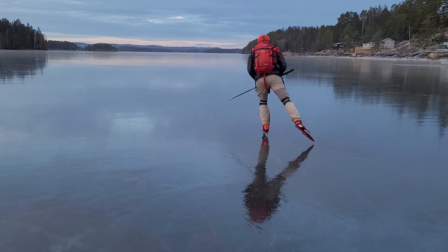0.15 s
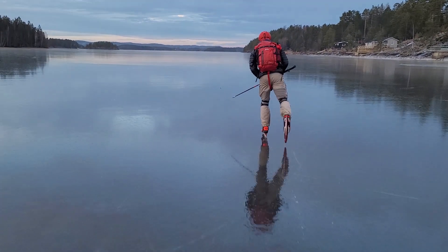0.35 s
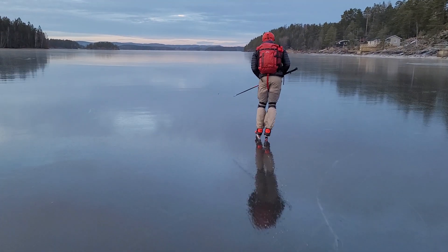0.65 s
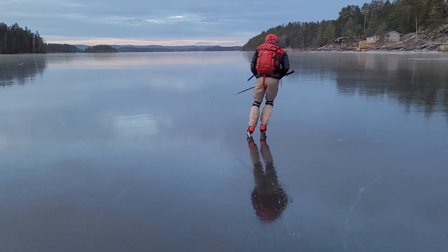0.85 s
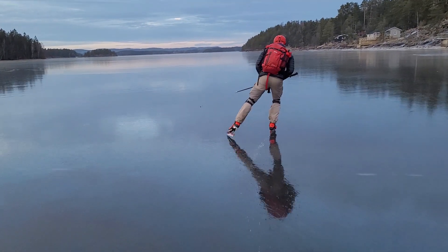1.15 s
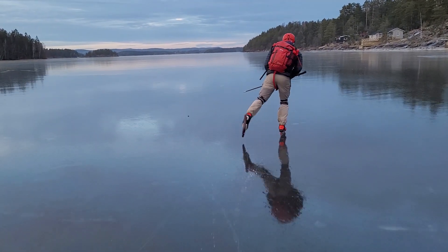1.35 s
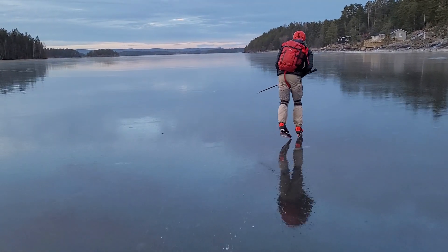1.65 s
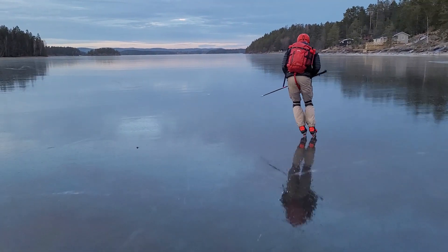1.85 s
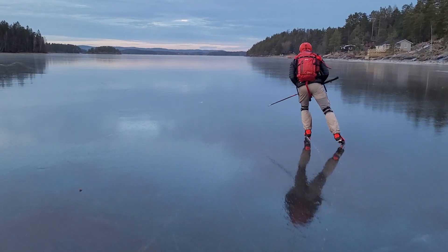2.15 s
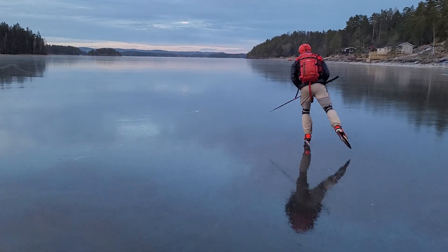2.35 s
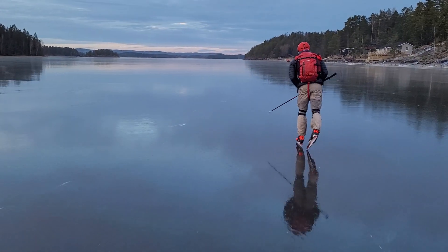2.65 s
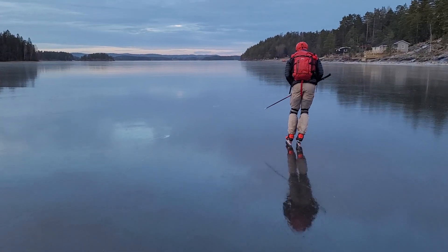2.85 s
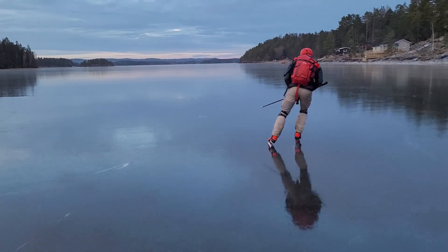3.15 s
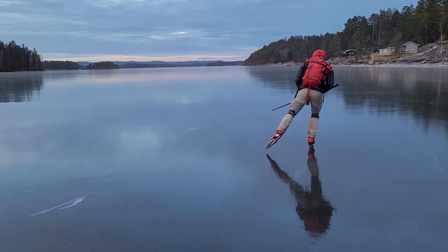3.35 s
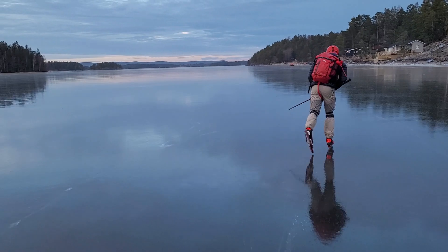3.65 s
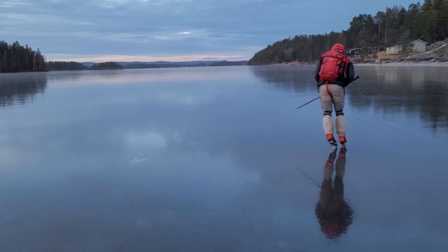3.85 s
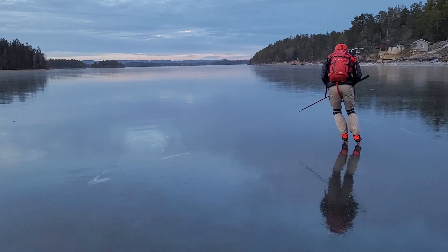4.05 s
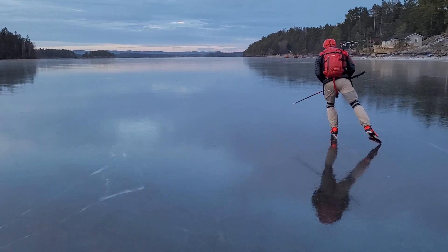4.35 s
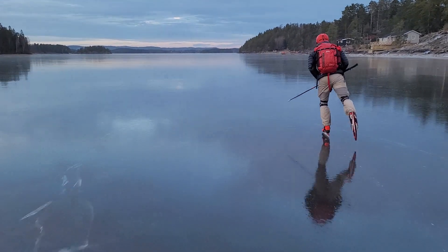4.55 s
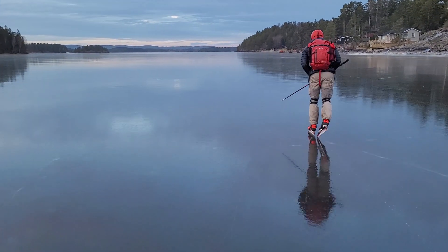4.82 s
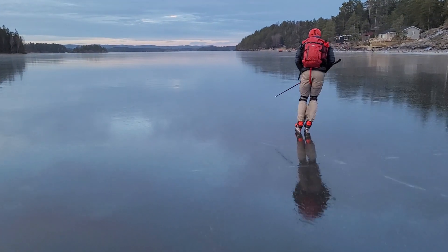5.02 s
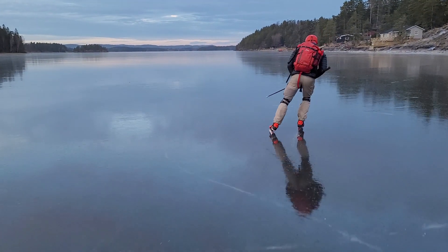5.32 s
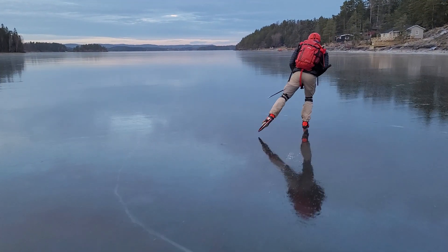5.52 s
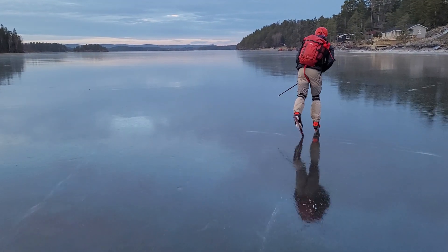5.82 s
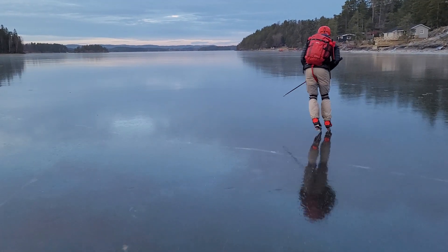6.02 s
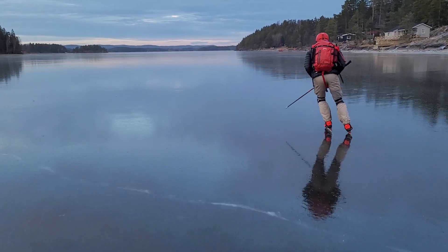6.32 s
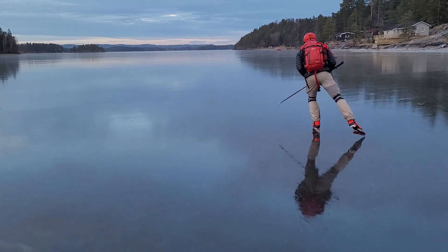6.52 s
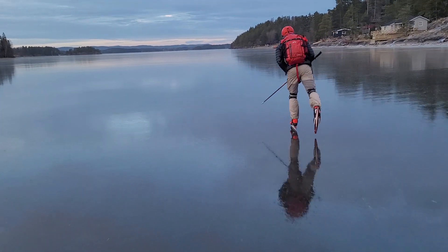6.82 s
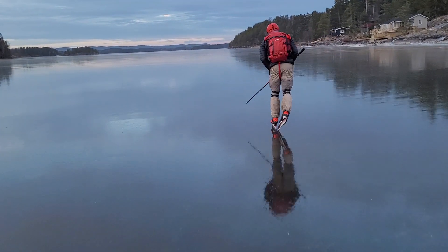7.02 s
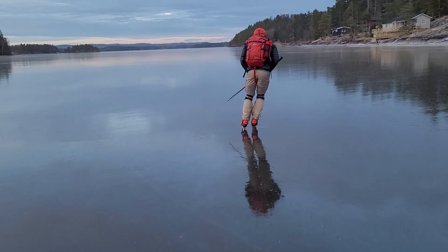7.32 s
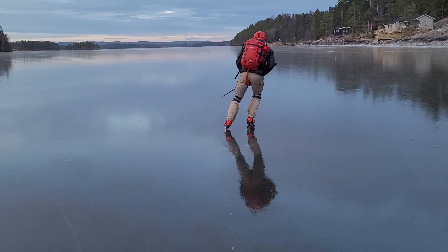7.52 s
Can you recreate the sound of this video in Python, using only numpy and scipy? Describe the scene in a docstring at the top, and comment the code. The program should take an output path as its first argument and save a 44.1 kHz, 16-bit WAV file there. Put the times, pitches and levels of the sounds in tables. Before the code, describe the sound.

Skate blades stride over bare lake ice about once a second, clinking, grinding and scraping hard at push-offs, with dry cracks and gusty wind buffeting.

```python
"""A tour skater strides over black lake ice, about once a second, followed closely by the listener.
Each blade clinks and chatters down, grinds under the weight and throws fine ice at the push-off.
The ice answers with short dry cracks, faint ticks and bright chips: jolts of noise made to ring.
The headwind buffets the microphone ports in gusts of low noise, with a few heavy thumps and a faint
steady rush of air; the open lake gives no echo."""
import sys
import numpy as np
from scipy import signal
from scipy.fft import rfft, irfft, next_fast_len
from scipy.io import wavfile
from scipy.ndimage import uniform_filter1d

SR = 44100
rng = np.random.default_rng(int(sys.argv[2]) if len(sys.argv) > 2 else 0)


def wrap_up_sound(samples):
    """Save the sound to the file named by the first command line argument, as 16-bit audio."""
    columns = np.atleast_2d(samples).T
    # keep every value between -1 and 1, then stretch to whole-number steps
    tamed = np.clip(columns, -1, 1)
    steps = np.round(tamed * 32767).astype(np.int16)
    wavfile.write(sys.argv[1], SR, steps)


N = 338247  # length of the scene in samples

# All levels in dB are settings, before the shared resonances and the left-right balance.
# quiet glide of the standing blade: (time [s], grinding level [dB])
GLIDE = [(0, -43), (.32, -50), (.62, -40.5), (.9, -37), (1.3, -50), (1.7, -39.5), (2.5, -47.5), (3.05, -59),
         (3.6, -40.5), (3.88, -60), (4.2, -43.5), (4.5, -53), (4.85, -43.5), (5.3, -38), (5.88, -45.5),
         (6.3, -40.5), (6.5, -52.5), (6.68, -39), (7.36, -35), (7.67, -47.5)]
# strides: (blade bites [s], push-off [s], grinding while loaded [dB], grinding at the push-off [dB],
# spray at the push-off [dB])
STRIDES = [(-.1, 0.169, -45, -45, -41), (0.819, 1.101, -38, -35, -32.5), (1.614, 2.3, -49.5, -36, -53),
           (2.862, 3.119, -37, -27, -34.5), (3.954, 4.311, -47.5, -35, -42),
           (4.902, 5.185, -34, -20, -29.5), (6.001, 6.145, -39.5, -33, -45), (6.845, 7.041, -38, -24, -35)]
# an edge scuffs over rough ice: (time [s], length [s], grinding level [dB], spray level [dB])
SCUFFS = [(0.296, 0.0078, -28, -42), (0.479, 0.019, -57, -42.5), (0.584, 0.015, -29.5, -48),
          (1.433, 0.019, -33.5, -39), (2.449, 0.013, -39, -41), (2.586, 0.049, -38, -54),
          (3.211, 0.017, -33, -44), (3.338, 0.063, -41.5, -42), (4.168, 0.047, -43, -43),
          (4.371, 0.036, -41, -49), (4.654, 0.029, -33, -48), (6.164, 0.053, -33, -47),
          (7.13, 0.026, -32, -41), (7.209, 0.018, -33, -36.5), (7.348, 0.042, -43, -43)]
# ringing pitches of the blade on the ice: (pitch [Hz])
CRUNCH_HZ = [962, 1223, 1643, 2190, 2860, 3540, 4800, 5380]
# steel clinks as a blade is set down: (time [s], ring pitch [Hz], ring level [dB])
CLINKS = [(.7742, 2290, -12), (0.8182, 1850, -14), (.836, 1740, -33), (1.7659, 1820, -27),
          (2.7867, 2160, -25.5), (2.8085, 1860, -33), (2.8573, 1820, -25.5), (2.87, 1880, -28),
          (2.8867, 1760, -22), (3.872, 2330, -32), (4.0076, 2900, -30.5), (4.868, 2100, -33.5),
          (4.9019, 1880, -28), (4.923, 2390, -28.5), (4.9478, 1850, -23.5), (5.033, 1860, -28),
          (5.8537, 2230, -21), (5.9435, 1710, -22.5), (5.992, 2460, -24.5), (6.7837, 1890, -19),
          (6.843, 2300, -26)]
# the ice cracks under a blade: (time [s], strength [dB], low knock relative to strength [dB],
# bright snap relative to strength [dB])
CRACKS = [(0.1637, -43, 10, 8.5), (0.6033, -41.5, 5.5, 4), (0.8957, -27, 1.5, -6), (1.105, -41, 15.5, 2),
          (1.211, -40, 8.5, -6), (1.2255, -39.5, 12.5, -1), (1.311, -38.5, 6, -6),
          (1.3441, -33.5, -8, -5.5), (1.513, -37, 8.5, -3), (1.571, -35, -3, -9), (1.624, -27, 9, -15),
          (1.6486, -29, 7.5, -8), (1.742, -44.5, 20.5, 4), (1.8857, -32, 10, -17),
          (1.9865, -31.5, -15, 5.5), (2.0455, -25.5, -1.5, -3), (2.0887, -33.5, 1.5, -8),
          (2.1292, -33.5, 5, 3.5), (2.1889, -27.5, -6, -7), (2.2464, -28.5, 2, -4), (2.28, -35, -3, -14),
          (2.2977, -32.5, -2, -1.5), (2.341, -35.5, -19, -8), (2.5298, -28.5, 3, -3.5),
          (2.5974, -31.5, -9, -7), (3.0977, -25, -23, -5), (3.1991, -38.5, 11, -1),
          (3.434, -33.5, 7.5, -5.5), (3.5667, -29, -8, -9), (3.5833, -35, 5, -14), (3.6228, -38, -23, -7),
          (3.656, -38.5, 7, -2), (3.9362, -35, 6.5, -3.5), (4.025, -28.5, -0.5, -4), (4.2329, -36.5, 1, -8),
          (4.389, -38.5, 3, 3), (4.4193, -41.5, 13.5, -2), (4.507, -40.5, 8.5, -21), (4.643, -34, -2, -7.5),
          (4.8111, -32, -2, -11), (5.1907, -34.5, 3, -10), (5.303, -40, 11, 4.5), (5.369, -33, -2, -11),
          (5.4528, -31.5, 3.5, -10), (5.5137, -26.5, -3, -14), (5.6419, -19, -5, -14),
          (5.7696, -44, 14.5, -5), (6.0051, -29.5, -3, -3.5), (6.0653, -35.5, 7, -2),
          (6.1147, -35, -7, -14), (6.396, -37.5, -4, -17), (6.594, -31, -9, 0), (6.677, -36.5, 4, -9),
          (6.7011, -26.5, -6, -10.5), (6.8583, -35, -1, -18), (6.9123, -28.5, 6, -7), (6.9833, -33, 11, -2),
          (7.0057, -28, 3, -3.5), (7.0911, -29.5, 5, -3.5), (7.1985, -37, 5.5, -5), (7.2565, -31.5, 8, -6),
          (7.372, -24.5, 0, -10), (7.4414, -24.5, 3, -6.5)]
# tiny chips fly off the edge: (time [s], snap level [dB])
CHIPS = [(0.697, -38), (1.0625, -39.5), (1.375, -35), (1.8575, -37), (1.9233, -38), (2.1, -36),
         (2.9963, -42), (3.384, -36), (4.307, -33.5), (4.8271, -35.5), (5.4751, -32), (6.5417, -39.5),
         (6.973, -37)]
# resonances and hollows shared by all skating sounds: (pitch [Hz], width [Hz], boost or cut [dB])
BODY = [(880, 220, 3.5), (1768, 140, 4.5), (2240, 90, -1), (2900, 170, 2), (3350, 880, -4.5),
        (4230, 950, 3), (7200, 610, 1.5), (11050, 910, -5), (15000, 630, 10)]
# timing between the two ports: (pitch [Hz], phase by which the left port leads [radians])
PORT_PHASE = [(400, 0), (1300, -.7), (2100, -.3), (2700, -.9), (3300, -2.3), (4700, -2.6), (5800, -1.7),
              (7500, -4.0)]
# headwind between gusts: (time [s], buffeting level [dB], deep rumble level [dB])
HEADWIND = [(0, -40, -45), (.33, -50, -58), (.6, -39, -41), (.72, -41.5, -52), (.98, -32, -37),
            (1.27, -45, -54), (1.42, -37.5, -35.5), (1.82, -37.5, -46), (2.2, -44.5, -43), (2.5, -48, -49),
            (2.88, -33, -36.5), (3.3, -42, -47), (4.18, -37, -42), (4.38, -48.5, -51.5),
            (4.83, -45.5, -56.5), (5.0, -35, -39), (5.4, -36.5, -41), (6.05, -33.5, -43), (6.25, -37, -53),
            (6.55, -45, -41), (6.7, -42, -60), (7.15, -33, -45), (7.67, -42.5, -49)]
# gusts: (time [s], length [s], buffeting level [dB], deep rumble level [dB])
GUSTS = [(0, 0.037, -30, -40.5), (0.166, 0.029, -36, -45), (0.532, 0.024, -31, -36),
         (0.795, 0.044, -34, -39), (0.946, 0.048, -28.5, -41), (1.206, 0.023, -34.5, -52),
         (1.304, .12, -27.5, -31.5), (1.586, 0.1, -23.5, -35), (1.86, 0.13, -24.5, -31.5),
         (2.284, 0.022, -26, -33), (2.618, 0.022, -35, -38), (2.724, 0.051, -38, -35.5),
         (2.921, 0.046, -30, -38), (3.041, 0.035, -29, -49), (3.101, 0.039, -26, -39),
         (3.206, 0.037, -29.5, -55), (3.359, 0.065, -31, -41), (3.562, 0.065, -33, -41),
         (3.861, 0.02, -47, -32.5), (4.165, 0.073, -29.5, -43), (4.648, 0.027, -33.5, -57),
         (4.986, 0.058, -28, -46), (5.191, 0.15, -28, -37), (5.613, 0.023, -46, -42),
         (5.766, 0.12, -34, -37.5), (5.954, 0.11, -29.5, -41), (6.317, 0.04, -37.5, -38),
         (6.44, 0.031, -27, -42), (6.541, 0.073, -29.5, -46), (7.123, 0.017, -23.5, -50),
         (7.464, 0.065, -28, -37.5)]
# single heavy blows of wind: (time [s], level of the swell's peak [dB], pitch [Hz])
THUMPS = [(.807, -23.5, 115), (.962, -16.5, 295), (1.607, -17, 114), (3.113, -16.5, 281), (3.925, -25, 406),
          (5.965, -20.5, 151), (6.342, -22.5, 380), (6.454, -21, 426)]
# tone colours as filter curves; only their shape matters: (pitch [Hz], gain [dB])
GRIND_COLOUR = [(300, -39), (700, 6.5), (1100, 5.5), (1500, 1), (2100, 2.5), (2800, 1.5), (3600, 4),
                (4500, -3), (5500, 0), (6400, -22), (9000, -37), (16000, -50)]
SPRAY_COLOUR = [(1500, 18), (4000, 11.5), (5500, 6.5), (6600, 9), (8000, 4), (9500, 3), (12500, 5.5),
                (14200, -1), (15600, -17.5)]
WIND_COLOUR = [(80, -18), (170, -22), (220, -2.5), (270, 1), (350, 4), (460, -0.5), (600, -7), (800, -17),
               (1500, -32), (5000, -65)]
RUMBLE_COLOUR = [(20, -21), (40, -2), (62, -1.5), (150, -2.5), (230, -9.5), (500, -47)]
AIR_COLOUR = [(25, -30), (70, 11.5), (200, -38), (390, -3), (700, 5.5), (1000, -16), (1400, -9),
              (3000, -13.5), (5300, -13.5), (6500, -18.5), (9000, -16.5), (15600, -24)]

# the blade takes the weight, and leaves the ice
BITE_S, LIFT_S = 0.032, 0.065
# the push-off builds up and lets go; a thin spray leads it, at a level relative to the push-off's
PUSH_BUILD_S, PUSH_RELEASE_S, DUST_BUILD_S, DUST_DB = 0.021, 0.012, 0.085, -4.5
# spray of a gliding blade, relative to its grinding
GLIDE_SPRAY_DB = -14.5
SCUFF_ATTACK_S, SCUFF_RELEASE_S = 0.0027, 0.0041
# chatter: length of the run, level relative to the loaded grinding, its spread, middle pitch
CHATTER_S, CHATTER_DB, CHATTER_SPREAD_DB, CHATTER_HZ = 0.13, 0, 3.5, 1950
# parts of each skip, relative to its ring
CHATTER_CLACK_DB, CHATTER_SNAP_DB = -5, -15
# parts of a clink, relative to its ring
CLINK_CLACK_DB, CLINK_KNOCK_DB, CLINK_SNAP_DB = -13.5, -42, -14.5
# a crack rings near one pitch; its hollow clack is relative to its strength
CRACK_HZ, CRACK_SPREAD_OCT, CRACK_CLACK_DB = 2300, 0.19, -1
# middle pitch of the hollow clack in a crack and in a faint tick
CLACK_HZ, CRACKLE_CLACK_HZ = 977, 1240
# faint ticks: mean level and spread; knock and snap relative to the level
CRACKLE_DB, CRACKLE_SPREAD_DB, CRACKLE_KNOCK_DB, CRACKLE_SNAP_DB = -42, 3, 1.5, -1
# share of the grinding's rise and fall that the faint ticks follow
CRACKLE_FOLLOWS = 0.28
# parts of a chip, relative to its snap
CHIP_RING_DB, CHIP_CLACK_DB, CHIP_KNOCK_DB = -8.5, -16, -7
# length of one tick, and the stretch of time over which its level is reckoned
TICK_SAMPLES, TICK_S = 1024, 0.008
GUST_ATTACK_S, GUST_RELEASE_S = 0.0061, 0.0054
AIR_DB = -49
CUTOFF_HZ = 15900


def blade_levels():
    """Grinding and spray in dB: a quiet glide, each stride's load and push-off, and the scuffs."""
    glide = from_db(in_time(GLIDE)[0])
    grind, dust = [glide], [glide * from_db(GLIDE_SPRAY_DB)]
    for bite_s, push_s, load_db, push_db, spray_db in STRIDES:
        load = from_db(load_db) * swell(bite_s, push_s - bite_s, BITE_S, LIFT_S)
        push = surge(push_s, PUSH_BUILD_S, PUSH_RELEASE_S)
        lead = from_db(DUST_DB) * surge(push_s, DUST_BUILD_S, PUSH_RELEASE_S)
        grind += [load, from_db(push_db) * push]
        dust += [from_db(spray_db) * np.maximum(push, lead)]
    for s, length_s, grind_db, spray_db in SCUFFS:
        scuff = swell(s, length_s, SCUFF_ATTACK_S, SCUFF_RELEASE_S)
        grind += [from_db(grind_db) * scuff]
        dust += [from_db(spray_db) * scuff]
    return summed_db(grind), summed_db(dust)


def grinding(level_db, chatter_db=1.0, patchy_db=5.0, scatter=0.87, trim_db=-5.5):
    """The edge cuts through many small fractures that make the blade ring, over a smooth rub."""
    fractures = grains(per_s=380, spread_db=4.5)
    crunch = 0
    for hz in CRUNCH_HZ:
        # the point of contact wanders along the blade and favours one pitch after another
        strikes = fractures * rng.standard_normal(N) * from_db(patchy_db * drift(21.0))
        crunch = crunch + resonance(strikes, hz, 0.088 * hz) * np.sqrt(hz)
    # noise common to both ports, plus noise of each port's own
    rub_noise = rng.standard_normal(N) + scatter * rng.standard_normal((2, N))
    rub = coloured(rub_noise, GRIND_COLOUR)
    cut = coloured(crunch, GRIND_COLOUR) + 0.36 * rub
    steady_cut = evened(cut * from_db(chatter_db * drift(44)), window_s=0.058)
    return from_db(level_db + trim_db) * steady_cut


def spray(level_db, scatter=6.1, trim_db=2.0):
    """Shaved ice dust fizzes off the edge: dense tiny grains and noise, in quick puffs."""
    dust = grains(per_s=4000, spread_db=5.5) + scatter * rng.standard_normal((2, N))
    puffs = from_db(3 * drift(60))
    return from_db(level_db + trim_db) * coloured(dust * puffs, SPRAY_COLOUR)


def clinks():
    """A blade is set down on the ice with small steel clinks: mostly ring, hardly any knock."""
    out = np.zeros((2, N))
    for s, hz, db in CLINKS:
        clink = tick(hz, db, db + CLINK_CLACK_DB, db + CLINK_KNOCK_DB, db + CLINK_SNAP_DB,
                     crumble_s=0.002, crumble=0.16, width_hz=820,
                     clack_hz=1300, clack_width_hz=710, snap_s=0.0016, sheen_db=-11.0)
        add(out, s, clink)
    return out


def chatter(count=9):
    """The edge skips in a short uneven run of small clinks before it holds."""
    out = np.zeros((2, N))
    for bite_s, _, load_db, *_ in STRIDES:
        # one skip at a random moment in each equal slice of the run
        slices = (np.arange(count) + rng.random(count)) / count
        for s in bite_s + CHATTER_S * slices:
            db = load_db + CHATTER_DB + CHATTER_SPREAD_DB * rng.standard_normal()
            hz = CHATTER_HZ * 2 ** (CRACK_SPREAD_OCT * rng.standard_normal())
            clink = tick(hz, db, db + CHATTER_CLACK_DB, db + CLINK_KNOCK_DB, db + CHATTER_SNAP_DB,
                         clack_hz=1340, crumble_s=0.0054, sheen_db=-15.0)
            # skips due before the start stay silent
            add(out, s, clink * (s > 0))
    return out


def cracks():
    """The loaded ice gives way: ring and hollow clack together, with a knock and a snap."""
    out = np.zeros((2, N))
    for s, db, knock_db, snap_db in CRACKS:
        pitch_shift = 2 ** (CRACK_SPREAD_OCT * rng.standard_normal(2))
        hz, clack_hz = np.array([CRACK_HZ, CLACK_HZ]) * pitch_shift
        crack = tick(hz, db, db + CRACK_CLACK_DB, db + knock_db, db + snap_db,
                     clack_hz=clack_hz, clack_width_hz=550,
                     crumble=0.35, scatter=0.3, snap_s=0.0016, sheen_db=-11.5)
        add(out, s, crack)
    return out


def chips():
    """Splinters of ice snap off, thin and bright."""
    out = np.zeros((2, N))
    for s, db in CHIPS:
        chip = tick(CRACK_HZ, db + CHIP_RING_DB, db + CHIP_CLACK_DB, db + CHIP_KNOCK_DB, db,
                    snap_s=0.00078, sheen_db=-5.5, sheen_slope=0.15)
        add(out, s, chip)
    return out


def crackle(grind_db, count=56):
    """Faint ticks all along the way, each with its own colour, stronger where the blade grinds harder."""
    out = np.zeros((2, N))
    for s in (np.arange(count) + rng.random(count)) / count * N / SR:
        db = CRACKLE_DB + CRACKLE_FOLLOWS * (grind_db[int(s * SR)] - grind_db.mean())
        # ring, clack, knock and snap
        mix_db = np.array([0, CRACK_CLACK_DB, CRACKLE_KNOCK_DB, CRACKLE_SNAP_DB])
        parts_db = db + mix_db + CRACKLE_SPREAD_DB * rng.standard_normal(4)
        pitch_shift = 2 ** (CRACK_SPREAD_OCT * rng.standard_normal(2))
        hz, clack_hz = np.array([CRACK_HZ, CRACKLE_CLACK_HZ]) * pitch_shift
        add(out, s, tick(hz, *parts_db, clack_hz=clack_hz, sheen_db=rng.normal(-10, 4)))
    return out


def tick(ring_hz, ring_db, clack_db, knock_db, snap_db, crumble_s=0.0028, crumble=0.28, scatter=0.26,
         width_hz=650, clack_hz=930, clack_width_hz=380, snap_s=0.0021, sheen_db=-9.0, sheen_slope=0.13):
    """One jolt and a few ms of crumbling excite a damped ring, a clack, a knock and a snap."""
    t = np.arange(TICK_SAMPLES) / SR
    shared, own = rng.standard_normal(TICK_SAMPLES), rng.standard_normal((2, TICK_SAMPLES))
    jolt = (t == 0) * rng.choice([-1, 1])
    force = 2 * jolt + (crumble * shared + scatter * own) * np.exp(-t / crumble_s)
    ring = band(resonance(force, ring_hz, width_hz), 1526, 3380, order=3)
    clack = band(resonance(force, clack_hz, clack_width_hz), 653, 1900)
    knock = -band(force, 313, 551)
    # splinters follow the jolt, each burst with its own length and pitch
    fade = np.exp(-t / (snap_s * rng.uniform(0.72, 2.7)))
    splinters = (shared + 1.73 * own) * fade * (1 - np.exp(-t / 0.0003))
    crack = rms_one(band(resonance(splinters, rng.uniform(4260, 5990), 630), 2440, 5700))
    # the more the snap outweighs the ring, the brighter; sheen is counted from twice the crack
    sheen = from_db(sheen_db + sheen_slope * np.clip(snap_db - ring_db, -12, 18))
    snap = crack + 2 * sheen * rms_one(band(splinters, 6400, 12700))
    parts = ((ring, ring_db), (clack, clack_db), (knock, knock_db), (snap, snap_db))
    mixed = sum(from_db(db) * rms_one(part) for part, db in parts)
    # each level stands for the whole tick's energy spread over TICK_S seconds
    return mixed * np.sqrt(TICK_S * SR / TICK_SAMPLES)


def grains(per_s, spread_db):
    """Tiny fractures at random moments, a few much larger than the rest; overall power 1."""
    sizes = from_db(spread_db * np.minimum(rng.exponential(1, N), 4)) * rng.choice([-1, 1], N)
    return rms_one(sizes * (rng.random(N) < per_s / SR))


def body(x):
    """Shared resonances and hollows: a chain of filters lifts or lowers narrow ranges of pitch."""
    for hz, width_hz, db in BODY:
        w = 2 * np.pi * min(hz, 0.45 * SR) / SR
        damp, root = np.tan(np.pi * width_hz / SR), from_db(db / 2)
        top = [1 + damp * root, -2 * np.cos(w), 1 - damp * root]
        bottom = [1 + damp / root, -2 * np.cos(w), 1 - damp / root]
        x = signal.lfilter(top, bottom, x)
    return x


def from_ahead(x):
    """The skater is a little to the right, so the left port hears the blades later and softer."""
    size = next_fast_len(N + TICK_SAMPLES, True)
    turned = rfft(x[0], size) * np.exp(1j * on_bins(PORT_PHASE, size))
    left = irfft(turned, size)[:N]
    return np.array([left, x[1]]) * from_db([[-0.7], [0.7]])


def thumps(swell_s=0.0026):
    """A large eddy swells and rings out in a few low cycles, out of step at the two ports."""
    out = np.zeros((2, N))
    for s, db, hz in THUMPS:
        age = np.maximum(np.arange(N) / SR - s, 0)
        lump = age / swell_s * np.exp(np.maximum(1 - age / swell_s, -50))
        phase = rng.uniform(0, 1.4, (2, 1))
        out += from_db(db) * lump * np.sin(2 * np.pi * hz * age + phase)
    return out


def wind_levels():
    """Buffeting and rumble in dB: gusts ride on the slow headwind."""
    buffet, rumble = [[from_db(db)] for db in in_time(HEADWIND)]
    for s, length_s, buffet_db, rumble_db in GUSTS:
        gust = swell(s, length_s, GUST_ATTACK_S, GUST_RELEASE_S)
        buffet += [from_db(buffet_db) * gust]
        rumble += [from_db(rumble_db) * gust]
    return summed_db(buffet), summed_db(rumble)


def wind(level_db, spectrum, lumps_db, shared, left_db):
    """Eddies hit the ports as partly shared noise, in short lumps that differ from port to port."""
    eddies = rng.standard_normal((2, N)) + shared * rng.standard_normal(N)
    lumps = lumps_db * (drift(55) + np.array([drift(19), drift(42)]))
    gusts = evened(coloured(eddies * from_db(lumps), spectrum), window_s=0.07)
    return from_db(level_db) * gusts * from_db([[left_db], [-left_db]])


def air_rush():
    """A faint steady rush of air: coloured noise, separate at the two ports."""
    return from_db(AIR_DB) * coloured(rng.standard_normal((2, N)), AIR_COLOUR)


def from_db(db):
    """Turn decibels into gain."""
    return 10 ** (np.asarray(db) / 20)


def summed_db(gains):
    """Level in dB of independent sounds heard together: their powers add."""
    return 10 * np.log10(sum(gain ** 2 for gain in gains))


def rms_one(x):
    """Scale to an average power of 1."""
    return x / np.sqrt(np.mean(x ** 2) + 1e-20)


def evened(x, window_s=0.026):
    """Hold the short-term power close to 1, so that only the fine grain is left."""
    power = uniform_filter1d(np.mean(x ** 2, axis=0), max(int(window_s * SR), 1))
    return x / np.sqrt(np.maximum(power, 0) + 1e-6)


def in_time(rows):
    """Read each column of a curve at every sample."""
    s, *columns = np.transpose(rows)
    return [np.interp(np.arange(N) / SR, s, c) for c in columns]


def on_bins(points, size):
    """Read a table, along a logarithmic pitch scale, at the pitches of an FFT."""
    hz, value = np.transpose(points)
    bin_hz = np.arange(size // 2 + 1) * SR / size
    return np.interp(np.log(bin_hz + 1), np.log(hz), value)


def coloured(x, spectrum):
    """Filter a signal with a tone colour, then scale to an average power of 1."""
    size = next_fast_len(N, True)
    return rms_one(irfft(rfft(x, size) * from_db(on_bins(spectrum, size)), size)[..., :N])


def drift(rate):
    """Smooth random wandering with spread 1: noise smoothed twice, with its cutoff at rate [Hz]."""
    # made at every 20th sample; the first 2000 values let the filter settle
    r = np.exp(-40 * np.pi * rate / SR)
    noise = rng.standard_normal(N // 20 + 2002)
    slow = signal.lfilter([1], [1, -2 * r, r * r], noise)[2000:]
    return np.interp(np.arange(N) / 20, np.arange(len(slow)), rms_one(slow))


def band(x, low_hz, high_hz, order=2):
    """Keep only the pitches between two limits."""
    low = np.clip(low_hz, 10, SR / 4)
    edges = [low, np.clip(high_hz, low + 50, 0.48 * SR)]
    return signal.sosfilt(signal.butter(order, edges, "band", fs=SR, output="sos"), x)


def resonance(x, hz, width_hz):
    """One damped ringing pitch; the wider it is, the sooner it dies away."""
    r = np.exp(-np.pi * width_hz / SR)
    return signal.lfilter([1, 0, -1], [1, -2 * r * np.cos(2 * np.pi * hz / SR), r * r], x)


def swell(start_s, length_s, attack_s, release_s):
    """Gain that rises from start_s, holds and dies away."""
    age = np.arange(N) / SR - start_s
    return np.clip(age / attack_s, 0, 1) * np.exp(-np.clip((age - length_s) / release_s, 0, 20))


def surge(peak_s, build_s, release_s):
    """Gain that grows ever faster up to peak_s, then collapses."""
    age = np.arange(N) / SR - peak_s
    return np.exp(-np.minimum(np.maximum(-age / build_s, age / release_s), 20))


def add(out, s, sound):
    """Mix a short stereo sound in at its moment."""
    at = int(np.clip(s * SR, 0, N))
    out[:, at:at + TICK_SAMPLES] += sound[:, :N - at]


def scene():
    """Blades and ice ahead, wind at the ports, a faint steady rush of air."""
    grind_db, spray_db = blade_levels()
    buffet_db, rumble_db = wind_levels()
    blades = grinding(grind_db) + spray(spray_db) + clinks() + chatter()
    ice = cracks() + chips() + crackle(grind_db)
    skates = from_ahead(body(blades + ice))
    buffets = wind(buffet_db, WIND_COLOUR, lumps_db=3.5, shared=0.4, left_db=-0.8)
    rumble = wind(rumble_db, RUMBLE_COLOUR, lumps_db=3.0, shared=0.15, left_db=1.2)
    return skates + buffets + thumps() + rumble + air_rush()


def record(dry):
    """Cut the very top of the treble steeply, above CUTOFF_HZ."""
    return signal.sosfilt(signal.ellip(10, 0.2, 80, CUTOFF_HZ, fs=SR, output="sos"), dry)


dry = scene()
out = record(dry)
wrap_up_sound(out)
```